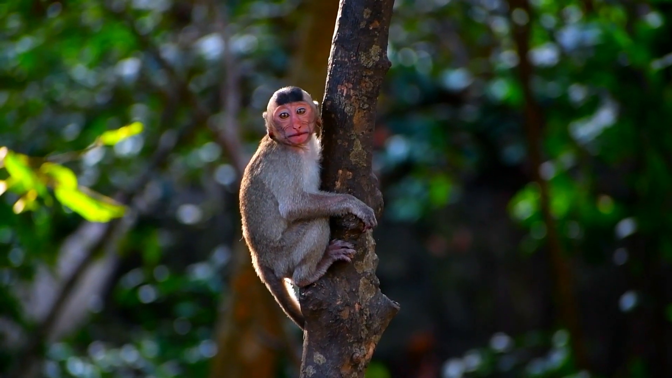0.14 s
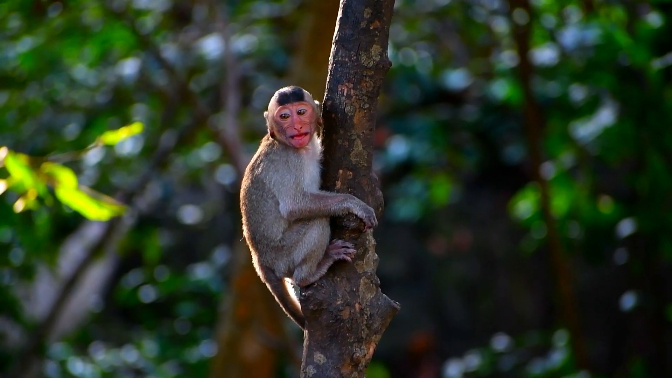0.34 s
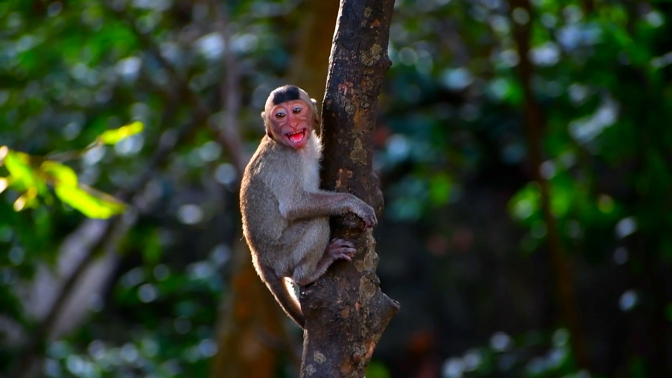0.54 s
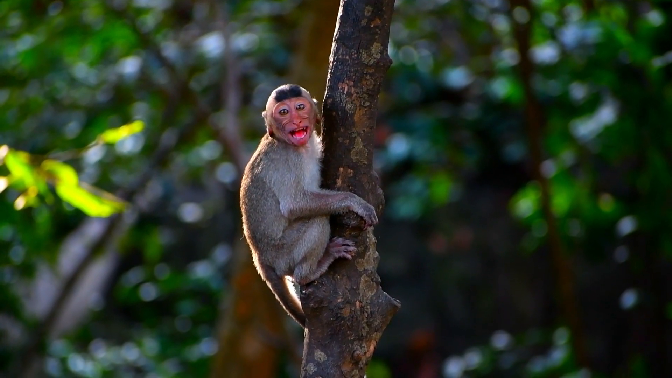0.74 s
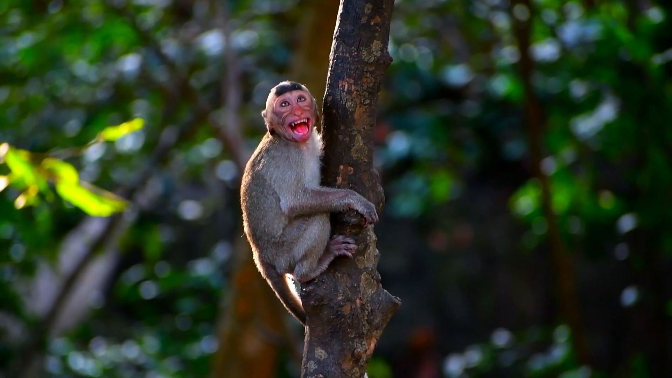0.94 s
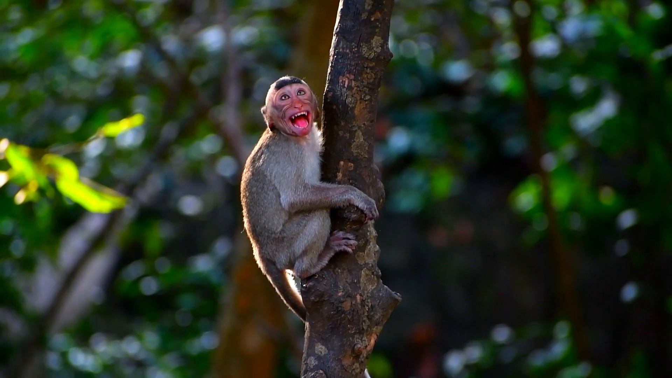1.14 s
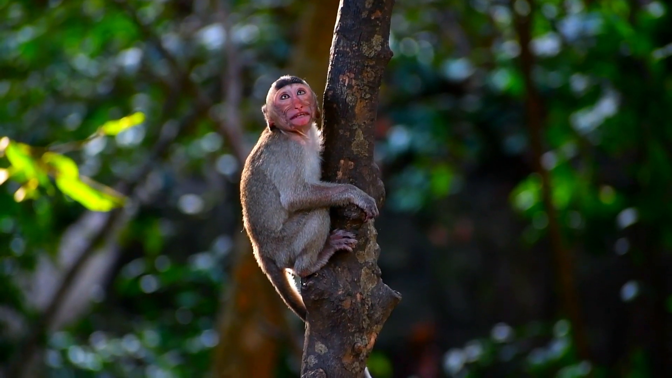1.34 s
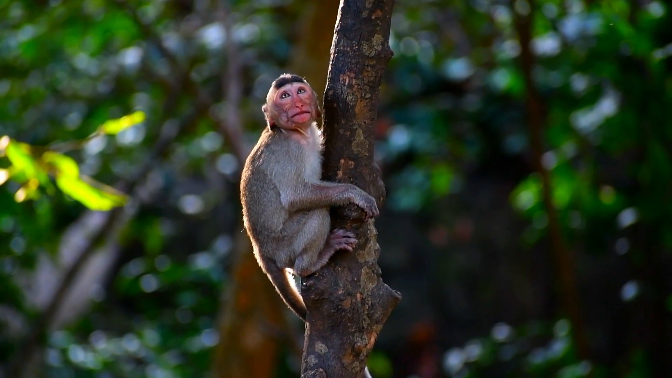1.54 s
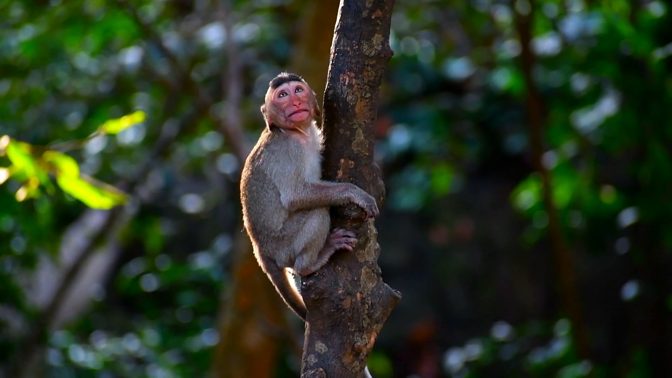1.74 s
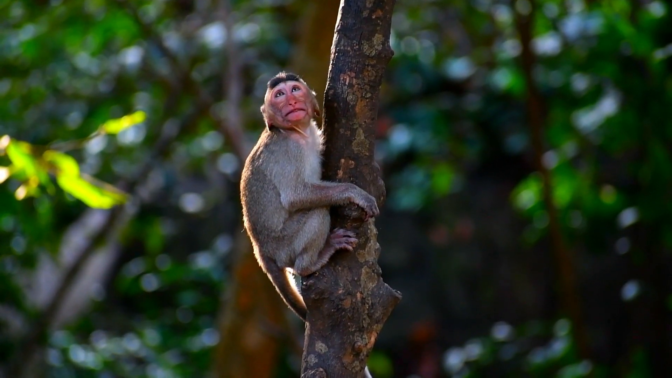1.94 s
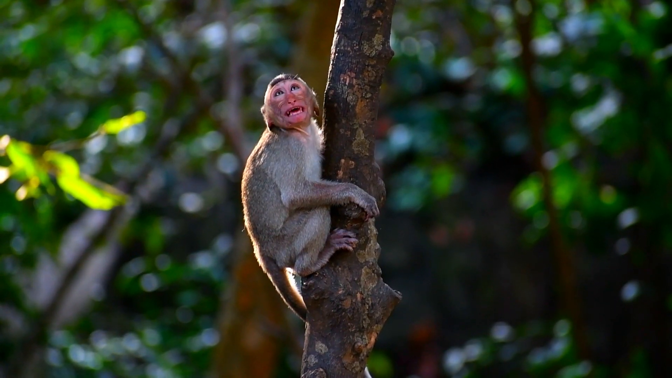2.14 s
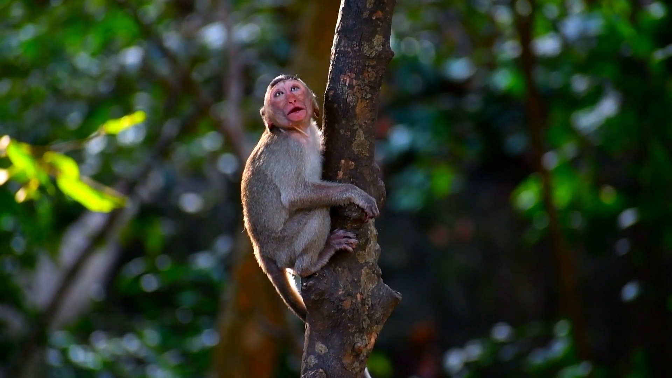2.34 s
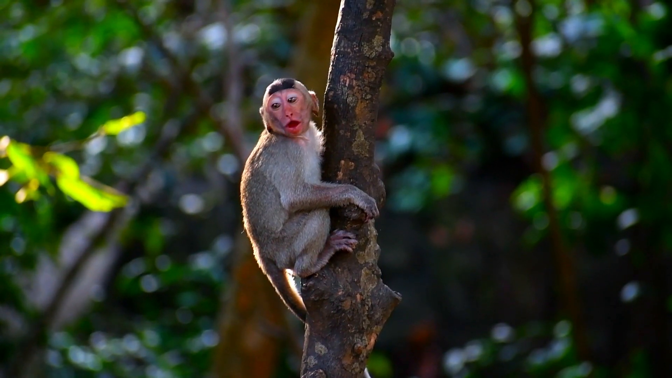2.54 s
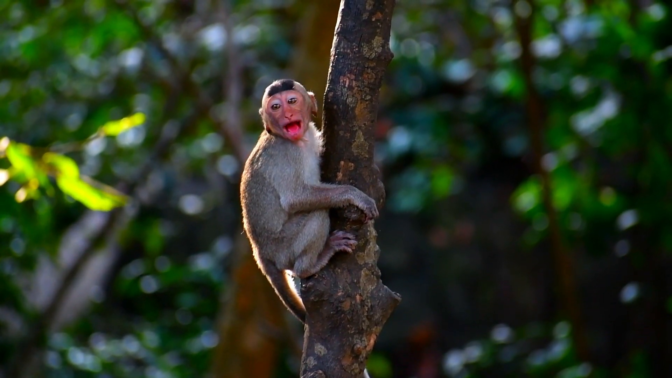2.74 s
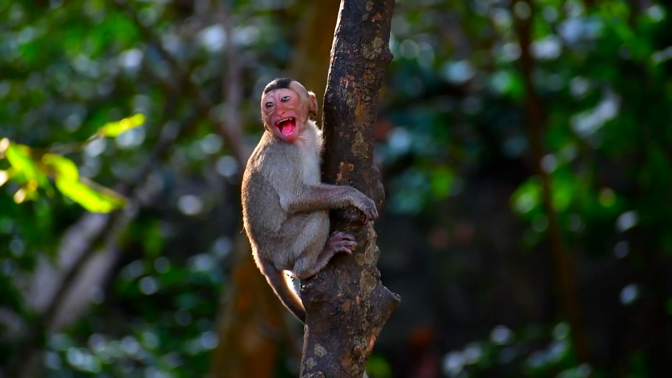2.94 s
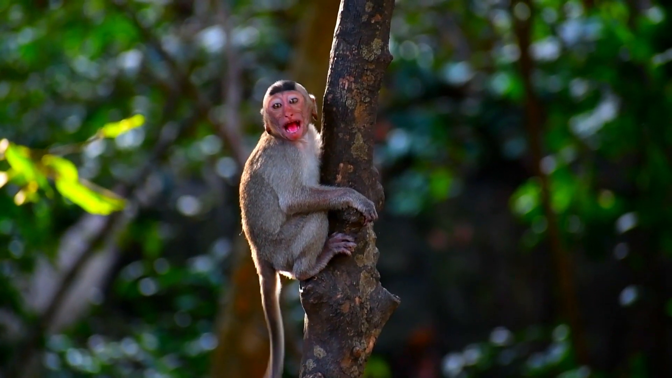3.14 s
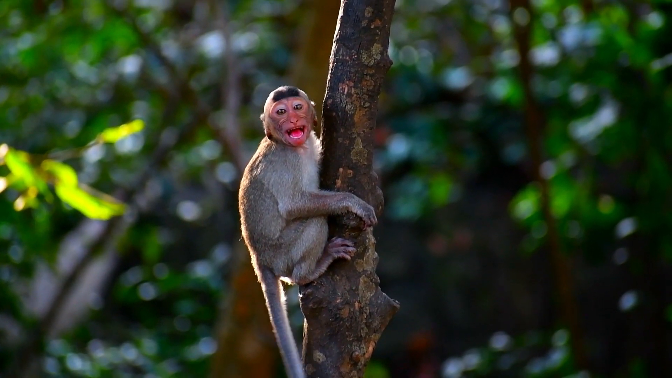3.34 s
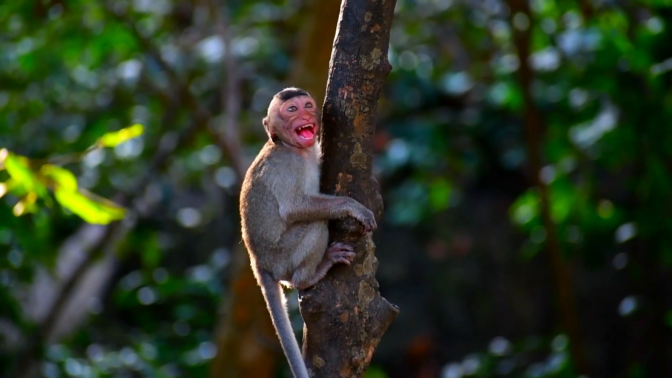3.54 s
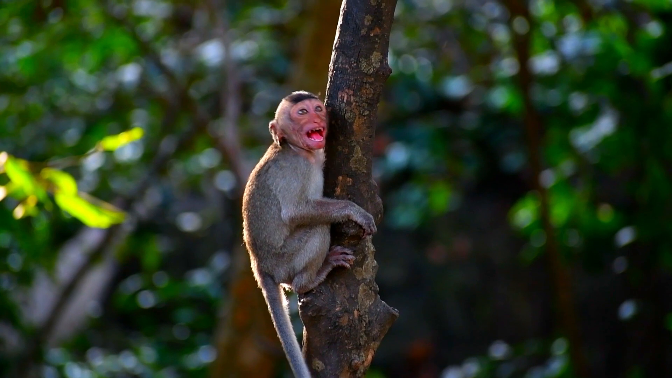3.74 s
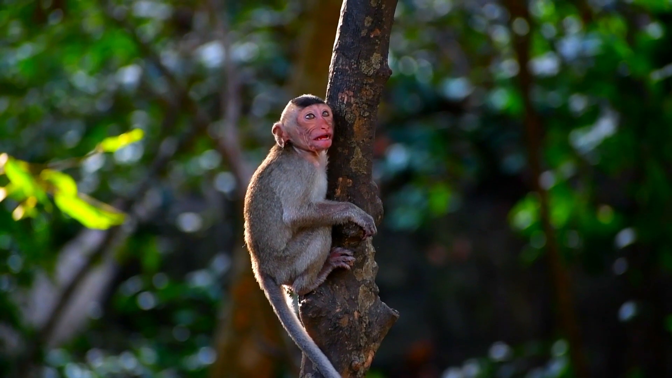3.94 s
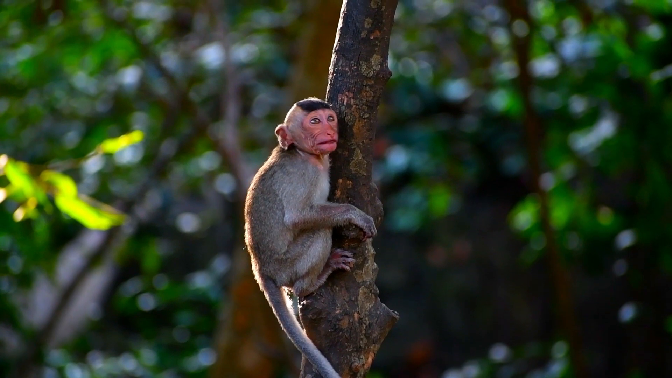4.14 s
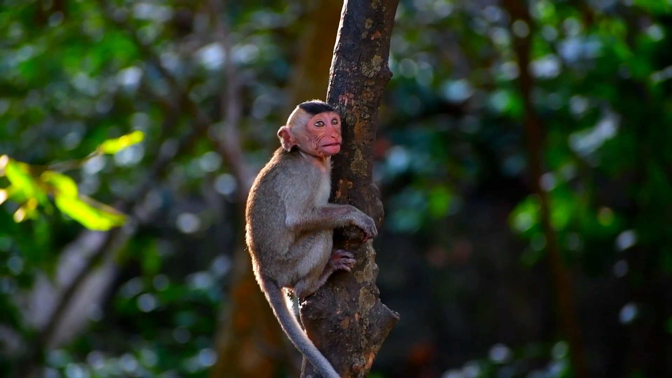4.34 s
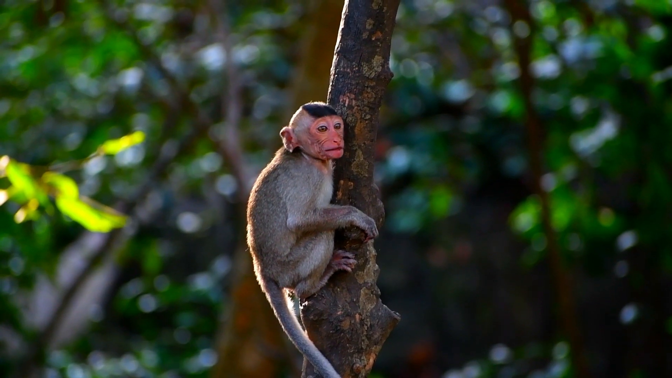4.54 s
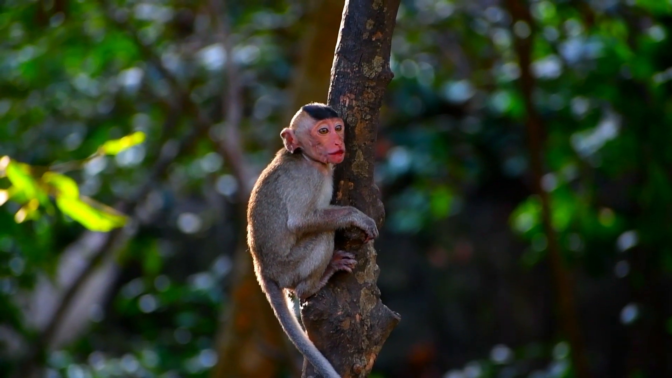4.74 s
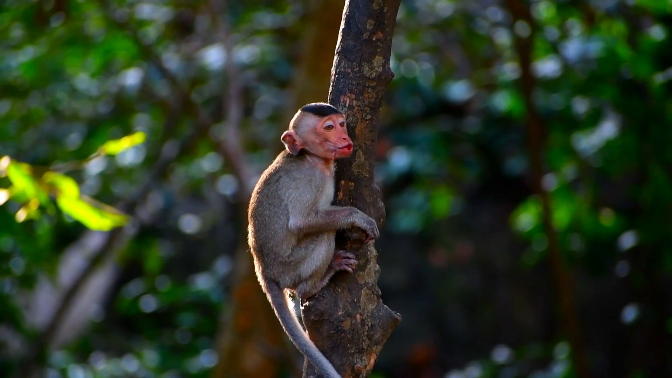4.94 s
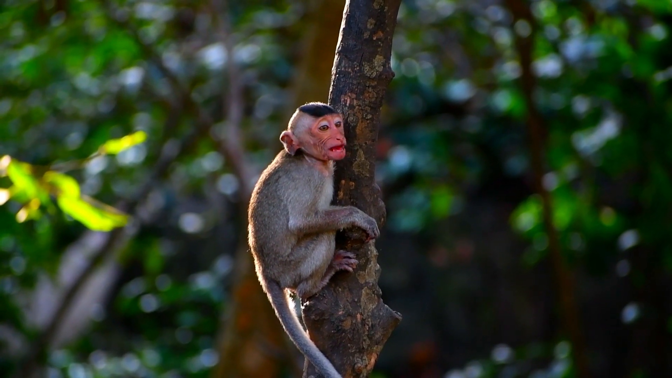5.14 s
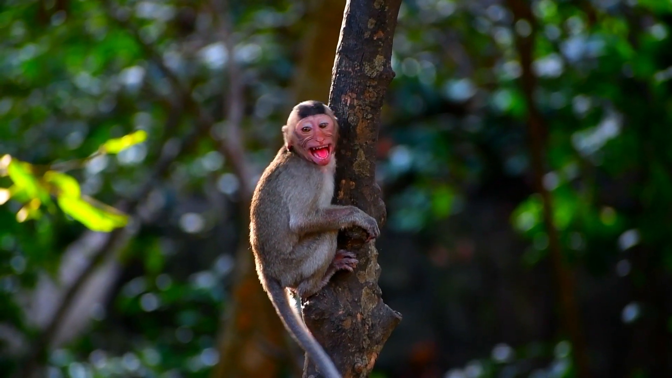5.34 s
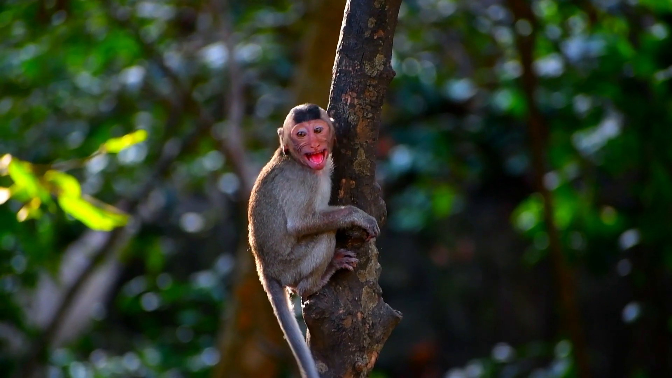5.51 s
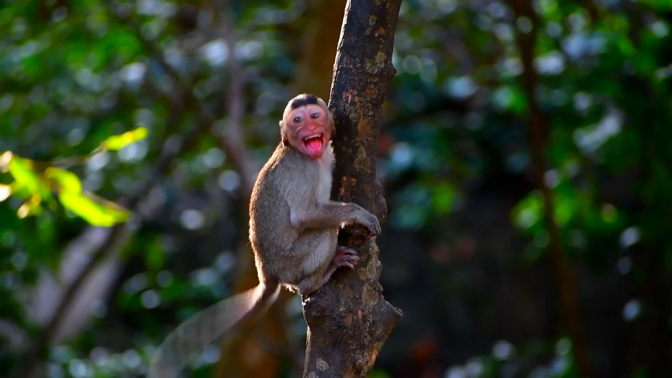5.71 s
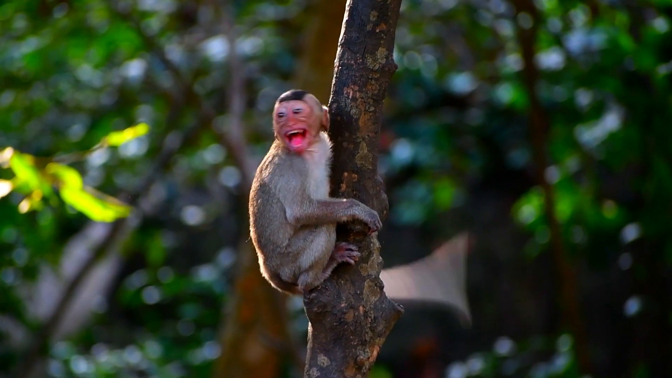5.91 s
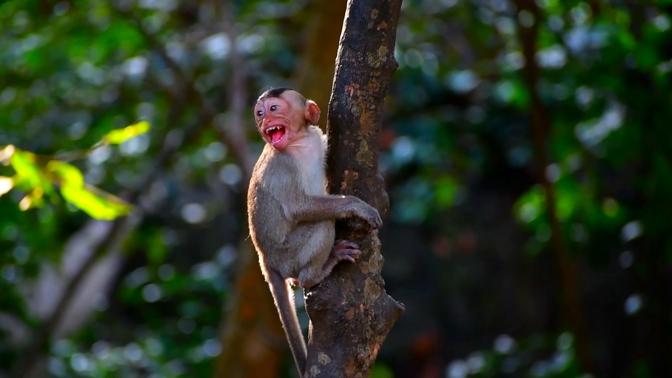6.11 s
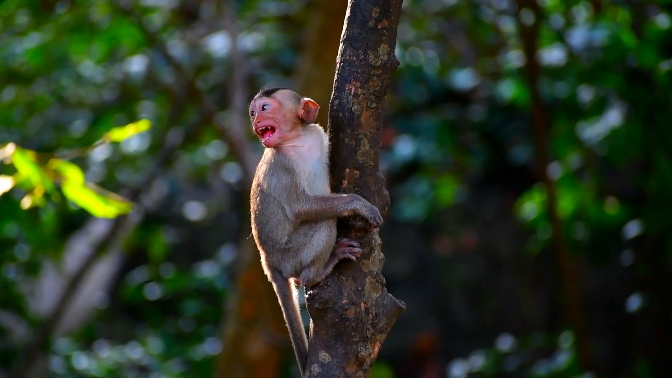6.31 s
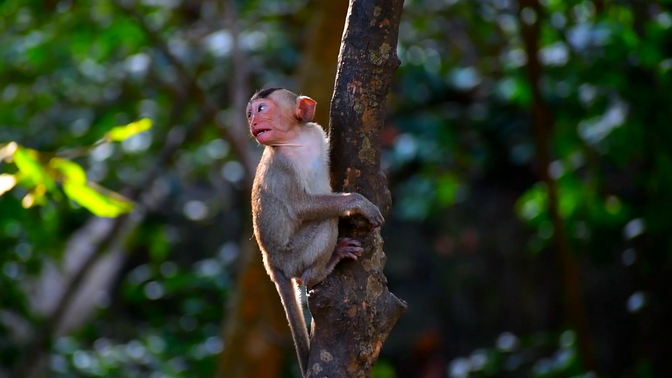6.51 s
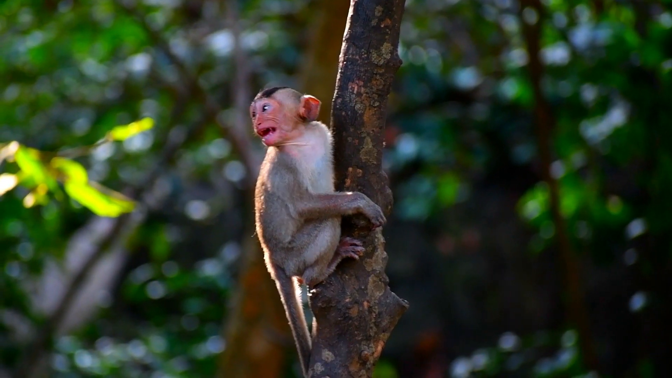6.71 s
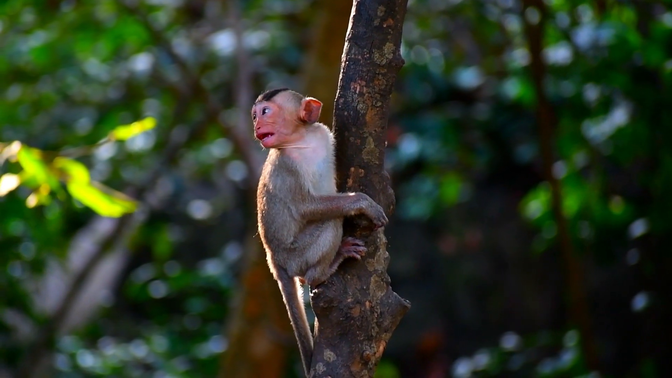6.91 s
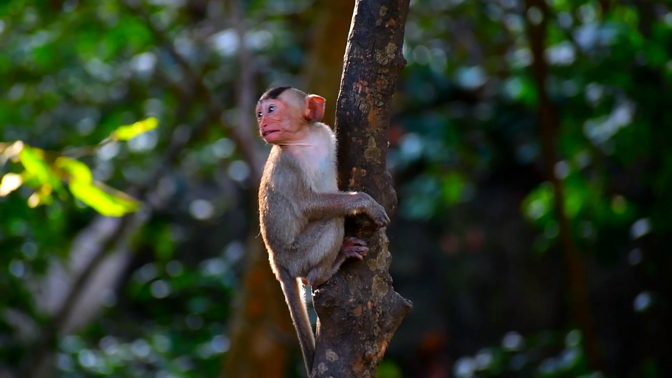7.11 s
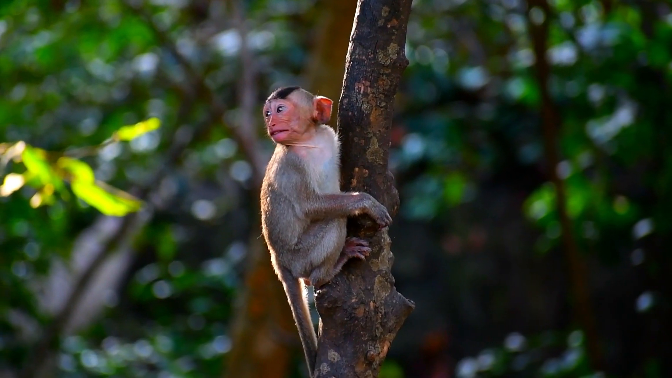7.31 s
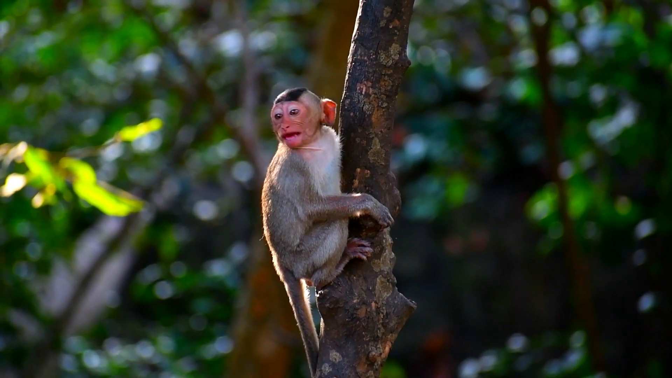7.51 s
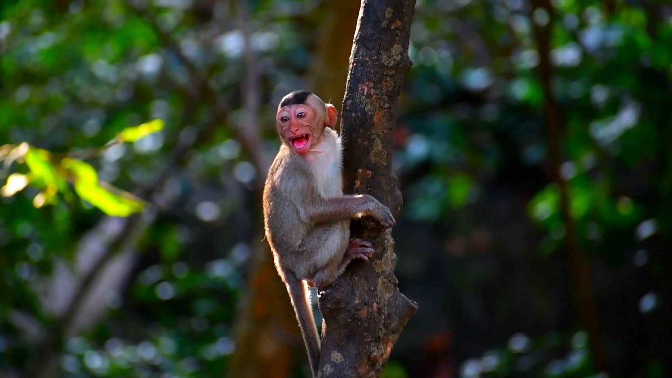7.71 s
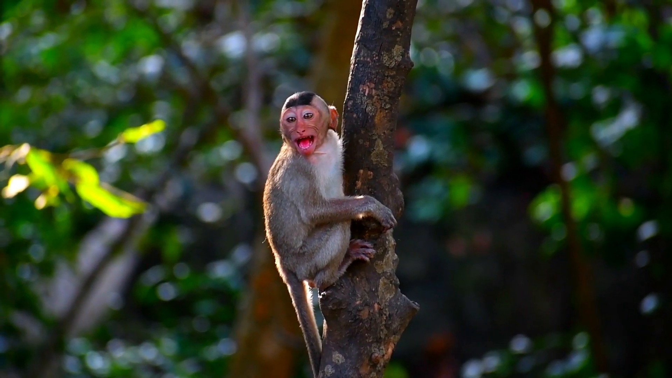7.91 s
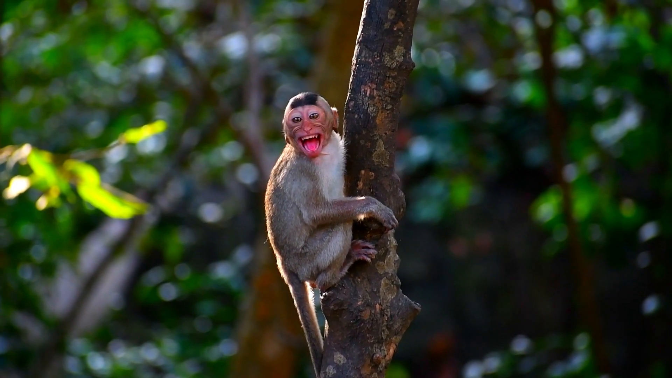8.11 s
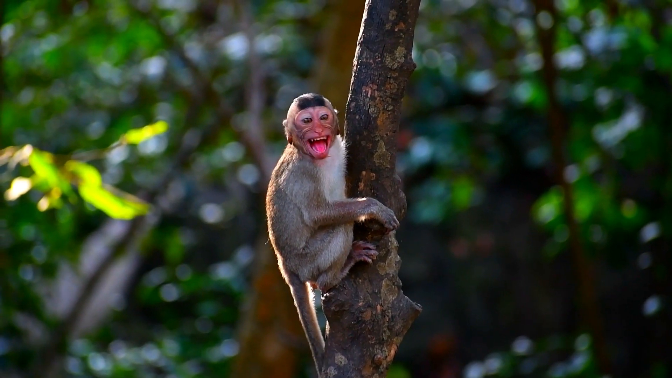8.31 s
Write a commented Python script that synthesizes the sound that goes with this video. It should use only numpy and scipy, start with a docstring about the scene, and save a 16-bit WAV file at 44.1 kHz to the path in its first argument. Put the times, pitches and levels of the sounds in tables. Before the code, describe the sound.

A young macaque cries in a quiet forest, heard fairly close, with a short diffuse echo from the trees. The tail of a high cry opens the scene; at 0.3-0.65 s a raspy whimper leaps into a squeal, and at 0.85-1.15 s a very high whistle arcs up and drops into a hoarse bark. Faint animal coos linger until about 2.1 s, with a small throaty yelp at 2.1. A low whine from 2.4 climbs into a shriek near 2.75-3.0, a soft distant moan beneath it; more squeals follow at 3.25-3.75. After a lull, a brief whimper comes at 4.6, then piercing cries at 4.9-5.45 and 5.6-6.25. A short rasp sounds at 6.65-6.8, and squealing resumes from 7.5 to the end. Throughout, a far bird whoops roughly every second, faint pips tick evenly until about 8 s, sparse twig or lip clicks appear, and soft rumble, hum and hiss remain.

```python
"""An infant macaque cries in a forest: low calls rich in harmonics, very high whistled arcs and hoarse rasps.
Each call is a sum of harmonics on a gliding pitch; roughness shakes it and adds puffs of breath noise.
Far off a bird whoops, another pips evenly and other animals coo, all as near sines; twigs and lips tick
as short noise bursts. A dying noise cloud makes the trees' echo; shaped noise gives rumble and hiss, and
a wavering sine the low hum."""
import sys
import numpy as np
from scipy import signal
from scipy.fft import rfft, irfft, next_fast_len
from scipy.io import wavfile

SR = 44100
rng = np.random.default_rng(int(sys.argv[2]) if len(sys.argv) > 2 else 0)


def dump_mix(stems):
    """Bounce the given channels to the path in sys.argv[1] as a 16-bit WAV at rate SR."""
    frames = np.atleast_2d(stems).T  # one column per channel
    limited = np.clip(frames, -1, 1)  # hard clip at full scale
    pcm = np.round(limited * 32767).astype(np.int16)
    wavfile.write(sys.argv[1], SR, pcm)


N = 368676

# resonances of throat and open mouth, which also colour the breath: (f/Hz, level/dB)
THROAT = [(600, -20), (1000, -1), (2200, 1), (3300, 6), (4500, 0), (5400, -5), (6500, -22), (7700, -4),
          (9200, -7), (10800, -17), (12600, -17), (15500, -23)]


def infant():
    """One voice with two registers: high whistles and low chest cries."""
    # hoarseness: pitch shake, loudness shake, uneven cycle pairs, slow pitch drift (RMS fraction)
    folds = dict(jitter=0.3, shimmer=0.9, halves=0.5, wander=0.002)
    out = np.zeros(N)
    whistles(out, folds)
    chest_cries(out, folds)
    return out


def whistles(out, folds):
    """Nearly one tone with weak overtones, loud where its pitch crosses a resonance of the mouth."""
    # pitch path of each whistle: (t/s, f/Hz)
    pitch_paths = [
        [(0, 4080), (.16, 4010)],
        [(.405, 2700), (.428, 2820)],
        [(.428, 2690), (.492, 2796)],
        [(.492, 2910), (.514, 3670)],
        [(0.516, 3103), (0.553, 4880), (0.566, 5000), (0.584, 5712), (0.594, 5650), (0.612, 5240),
         (0.626, 4700), (0.634, 4000), (0.652, 3983)],
        [(0.866, 2750), (0.898, 6400), (0.93, 9240), (0.96, 11050), (1.0, 11650), (1.052, 10470), (1.104, 7500)],
        [(2.732, 3000), (2.754, 5430), (2.784, 8320), (2.808, 9840), (2.854, 10900), (2.932, 11470),
         (2.956, 10970), (2.978, 8575)],
        [(2.985, 4290), (3.007, 3700)],
        [(3.31, 2710), (3.343, 3620)],
        [(3.347, 3193), (3.365, 3660), (3.387, 5120), (3.417, 5970), (3.503, 6609), (3.549, 9570),
         (3.575, 10700), (3.613, 11330), (3.665, 9483), (3.689, 7121)],
        [(3.425, 5370), (3.485, 4500)],
        [(3.69, 4330), (3.729, 3333)],
        [(5.127, 2640), (5.139, 2710), (5.155, 3850), (5.205, 7980), (5.223, 9440), (5.255, 10970),
         (5.307, 13150), (5.331, 12800), (5.363, 9541)],
        [(5.364, 9970), (5.395, 7390)],
        [(5.387, 3774), (5.41, 4220), (5.44, 3877), (5.456, 3340)],
        [(5.646, 8700), (5.668, 12230), (5.684, 13230), (5.71, 13950), (5.73, 13850), (5.762, 12500),
         (5.778, 12350), (5.802, 11050)],
        [(5.808, 11070), (5.816, 11610), (5.868, 9829), (5.948, 8936), (5.994, 8631), (6.011, 8362)],
        [(6.012, 8330), (6.06, 8530)],
        [(6.06, 8310), (6.1, 8820), (6.125, 9160), (6.18, 8810), (6.213, 8450), (6.245, 7100)],
        [(7.565, 2674), (7.69, 3250)],
        [(7.69, 3230), (7.72, 3660), (7.775, 5510)],
        [(7.775, 5420), (7.79, 4670), (7.815, 3980), (7.845, 3640)],
        [(8.012, 3030), (8.025, 3450), (8.035, 4500)],
        [(8.053, 8652), (8.079, 11300), (8.109, 12690), (8.127, 12980), (8.163, 11930), (8.211, 9418),
         (8.245, 7094)],
        [(8.305, 8420), (8.325, 9870), (8.359, 11050)],
    ]
    # effort in the same order, before mouth and edges; the first is the tail of an earlier cry:
    # (level/dB at start, level/dB at end, roughness 0-1 at start, roughness 0-1 at end)
    efforts = [ (-51.5, -68, 0.35, 0.21), (-37, -30.5, 0.15, 0.14), (-40.5, -42, 0.45, 0.59),
               (-43, -35, 0.1, 0.36), (-28, -27, 0, 0.32), (-35, -33.5, 0.19, 0.029),
               (-30.5, -33.5, 0.23, 0.14), (-40.5, -39.5, 0.62, 0.86), (-39, -37, 0, 0.17),
               (-30, -33.5, 0.02, 0.029), (-39, -41, 0.1, 0.31), (-29.5, -44, 0.45, 0.35),
               (-39.5, -34, 0.23, 0.018), (-31.5, -34, 0.03, 0.45), (-27, -34.5, 0.49, 0.135),
               (-34, -30.5, 0.08, 0.058), (-30, -31.5, 0.16, 0.031), (-46, -34.5, 0.46, 0.21),
               (-29, -37, 0, 0.19), (-35, -36, 0.29, 0.25), (-26, -27, 0.08, 0), (-27.5, -32, 0.32, 0.16),
               (-40.5, -31, 0.1, 0), (-36, -32.5, 0, 0.16), (-32.5, -33.5, 0.03, 0.0093)]
    # soft edges: (attack/s, depth below/dB, release/s, depth below/dB)
    edges = 0.008, 1.3, 0.0049, 2.3
    # mouth resonances that the whistle's pitch crosses: (f/Hz, level/dB)
    mouth = [(2500, -4.5), (3000, 3.5), (3400, 5), (3750, -1.5), (4200, 1.5), (4800, -4), (5600, -0.5),
             (6800, -3), (8700, 8.5), (9500, 4.5), (10300, -4), (11200, 1.5), (11800, 0), (12800, 4.5),
             (14000, 3)]
    # overtone level against pitch, before the throat: (pitch f/Hz, level/dB per overtone step)
    overtone_steps = [(2700, -7), (3200, -17), (4500, -16), (6300, -10), (9000, -12)]
    # low whistles leak more air: (mean pitch f/Hz, breath level/dB re voice at full roughness)
    leak = [(2800, -2), (4000, -6), (9000, -20.5)]

    def harmonic_db(order, hz):
        step_db = at_hz(overtone_steps, hz / order)
        throat_db = 0.11 * (order > 1) * at_hz(THROAT, hz)   # faint throat colour on overtones only
        return step_db * (order - 1) + throat_db

    for path, effort in zip(pitch_paths, efforts):
        rows = syllable(path, *effort, edges, mouth)
        breath_db = at_hz(leak, rows[:, 1].mean())
        add_call(out, rows, harmonic_db, count=5, flutter_hz=500, breath_db=breath_db, **folds)


def chest_cries(out, folds):
    """Chest cries are pulses rich in harmonics, shaped by the throat."""
    # pitch path of each cry: (t/s, f/Hz)
    pitch_paths = [
        [(.322, 1093), (.352, 1365), (.38, 1550)],
        [(.405, 940), (.428, 920)],
        [(.428, 1828), (.46, 1484), (.492, 1471), (.514, 1670)],
        [(.592, 1408), (.612, 1306), (.626, 1187), (.659, 945)],
        [(.835, 913), (.865, 1710)],
        [(1.13, 1706), (1.143, 1455), (1.158, 1146)],
        [(2.072, 1076), (2.108, 1270), (2.117, 1599), (2.138, 1626), (2.148, 1900)],
        [(2.148, 2130), (2.19, 1506)],
        [(2.43, 874), (2.47, 970), (2.536, 1037), (2.585, 1058), (2.66, 1177), (2.688, 1292), (2.7, 1347),
         (2.729, 1800)],
        [(3.23, 863), (3.255, 1110), (3.275, 1163)],
        [(3.275, 958), (3.305, 1030), (3.312, 1346), (3.343, 1764)],
        [(4.615, 955), (4.64, 1126), (4.672, 1280)],
        [(4.672, 1403), (4.7, 1452), (4.735, 1354), (4.757, 1060)],
        [(4.92, 960), (4.96, 1094), (5.008, 1150), (5.046, 1253), (5.102, 1488), (5.128, 1780)],
        [(5.43, 1295), (5.458, 1060)],
        [(5.616, 1200), (5.63, 2300)],
        [(6.64, 977), (6.67, 1038), (6.685, 1150), (6.7, 1477), (6.733, 1542)],
        [(6.729, 564), (6.754, 545)],
        [(6.752, 1257), (6.77, 1159), (6.792, 1013)],
        [(7.5, 950), (7.52, 1430), (7.54, 1560), (7.557, 1490), (7.567, 1665)],
        [(7.567, 1737), (7.69, 1924)],
        [(7.815, 2194), (7.852, 1810)],
        [(8.0, 1106), (8.03, 2010)],
    ]
    # effort in the same order, before the edges: (level/dB at start, level/dB at end, roughness 0-1 at start,
    # roughness 0-1 at end, brightness/dB per octave over the first four harmonics, added to the throat)
    efforts = [ (-43.5, -53.5, 0.21, 0.23, -1.5), (-50, -44, 0.7, 0, 5), (-45, -34.5, 0.36, 0.095, 8),
               (-26, -32.5, 0.26, 0.35, 22), (-43.5, -36.5, 0.3, 0.37, 1.5), (-18.5, -34.5, 0.01, 0.39, 13),
               (-47, -40.5, 0.2, 0.22, -11.5), (-30, -51, 0.6, 0.63, -1), (-57, -35.5, 0, 0.18, -1),
               (-44, -42.5, 0.1, 0.22, 1.5), (-61, -32, 0, 0.0027, 6.5), (-45.5, -51.5, 0.1, 0.042, -14.5),
               (-43.5, -48, 0.04, 0.18, -1.5), (-51, -43, 0.07, 0.17, -7), (-40, -34.5, 0.12, .05, 9),
               (-31, -42, 0.27, 0.06, 2.5), (-43, -38.5, 0.04, 0, 1.5), (-26, -30, 0.14, 0.42, 11),
               (-35, -36.5, 0, 0.26, 3), (-45.5, -39.5, 0.1, 0.055, 4), (-35, -49.5, 0.31, 0.39, 12.5),
               (-36, -43, 0.08, 0, 5), (-39, -40, 0.23, 0.15, 3)]
    # soft edges: (attack/s, depth below/dB, release/s, depth below/dB)
    edges = 0.021, 11, 0.0095, 2.9
    for path, (*effort, tilt_db) in zip(pitch_paths, efforts):
        def harmonic_db(order, hz):
            return at_hz(THROAT, hz) + tilt_db * np.log2(np.minimum(order, 4))

        rows = syllable(path, *effort, edges)
        add_call(out, rows, harmonic_db, count=20, flutter_hz=200, breath_db=-13, **folds)


def syllable(path, start_db, end_db, rough_start, rough_end, edges, resonances=((1.0, 0), (SR, 0))):
    """Rows for a call: effort and roughness drift evenly, edges are softer, resonances colour the level."""
    s, hz = np.transpose(path)
    t = np.linspace(s[0], s[-1], int((s[-1] - s[0]) * 500) + 2)   # about 500 rows a second
    progress = (t - s[0]) / (s[-1] - s[0])
    hz = glide(s, hz, t)
    attack_s, attack_db, release_s, release_db = edges
    soft_db = attack_db * np.maximum(1 - (t - s[0]) / attack_s, 0)
    soft_db = soft_db + release_db * np.maximum(1 - (s[-1] - t) / release_s, 0)
    level_db = start_db + progress * (end_db - start_db) - soft_db + at_hz(resonances, hz)
    rough = rough_start + progress * (rough_end - rough_start)
    return np.transpose([t, hz, level_db, rough])


def glide(s, hz, t):
    """A smooth cubic through the pitch points that never overshoots them."""
    steps = np.diff(hz) / np.diff(s)
    before, after = np.r_[steps[0], steps], np.r_[steps, steps[-1]]
    slope = 2 * np.maximum(before * after, 0) / (before + after + 1e-9)   # flat at turning points
    i = np.clip(np.searchsorted(s, t) - 1, 0, len(s) - 2)
    span, rise = s[i + 1] - s[i], hz[i + 1] - hz[i]
    u = (t - s[i]) / span
    bend_in = (1 - u) * (span * slope[i] - rise)
    bend_out = u * (span * slope[i + 1] - rise)
    return hz[i] + u * rise + u * (1 - u) * (bend_in - bend_out)


def add_call(out, rows, harmonic_db, count, jitter=0.15, shimmer=1.0, flutter_hz=500, breath_db=-99.0,
             edge_s=0.002, halves=0, wander=0):
    """Add harmonics of a gliding pitch; rough folds shake pitch and strength and leak air."""
    s, hz, level_db, rough = np.transpose(rows)
    at = np.arange(max(int(s[0] * SR), 0), min(int(s[-1] * SR), N))
    t = at / SR
    size = len(t)
    rough = np.clip(np.interp(t, s, rough), 0, 1)

    pitch = np.maximum(glide(s, hz, t), 100)
    unsteady = jitter * (rough ** 1.7 + 0.008) * wobble(size, flutter_hz)
    unsteady = unsteady + wander * wobble(size, 25)
    phase = 2 * np.pi * np.cumsum(pitch * (1 + unsteady)) / SR

    orders = np.arange(1, count + 1)[:, None]
    audible = orders * pitch < 0.45 * SR   # no harmonics near or above half the sample rate
    gains = from_db(harmonic_db(orders, orders * pitch)) * audible
    gains = gains / np.sqrt(np.sum(gains ** 2, axis=0) / 2)   # unit power whatever the timbre
    voiced = np.sum(gains * np.sin(orders * phase), axis=0)
    voiced = voiced * (1 - 0.5 * rough + shimmer * (rough + 0.05) * wobble(size, flutter_hz))
    # uneven cycle pairs put bands halfway between the harmonics
    voiced = voiced * (1 + halves * rough * wobble(size, flutter_hz) * np.sin(phase / 2))

    # the leak lies above the lowest pitch and comes in puffs
    above = signal.butter(2, hz.min(), "high", fs=SR, output="sos")
    leak = signal.sosfilt(above, coloured(rng.standard_normal(size), THROAT))
    breath = rms_one(leak * wobble(size, flutter_hz)) * from_db(breath_db) * np.sqrt(rough)

    edge = np.clip(np.minimum(t - s[0], s[-1] - t) / edge_s, 0, 1)
    out[at] += (voiced + breath) * edge * from_db(np.interp(t, s, level_db))


def far_calls():
    """Coos, whoops and pips: near sines; distance makes them waver."""
    out = np.zeros(N)
    add_coos(out)
    add_whoops(out)
    add_pips(out)
    return out


def add_coos(out):
    """Coos and moans of other animals: a fundamental and its second harmonic."""
    # (t/s, length/s, start f/Hz, held f/Hz, end f/Hz, level/dB at start, level/dB at end, roughness 0-1,
    # second harmonic level/dB re fundamental)
    notes = [(0.831, 0.11, 1038, 990, 987, -47, -41, 0.11, -23),
             (0.975, 0.24, 990, 1002, 1013, -53, -47, .2, -14.5),
             (1.15, .38, 1088, 1024, 985, -46, -57.5, 0.4, -7.5),
             (1.427, 0.46, 590, 702, 720, -58, -61, 0.33, -9),
             (1.648, 0.47, 902, 960, 985, -55, -74.5, 0.17, 1),
             (2.678, 0.39, 484, 848.5, 727, -45.5, -48, 0, -18)]
    for *note, second_db in notes:
        levels = np.array([[0], [second_db]])
        add_call(out, coo(*note), lambda order, hz: levels + 0 * hz, count=2, jitter=0.285, shimmer=1.0,
                 flutter_hz=82.8, edge_s=0.005, halves=0.65)


def coo(s, length, start_hz, held_hz, end_hz, start_db, end_db, rough):
    """Rows for a coo: a held note, reached and left by quick bends, its level drifting evenly."""
    rise_s, end_s = 0.05, 0.0515   # time constants of the bends
    t = np.linspace(0, length, num=40)
    bend_in = (start_hz - held_hz) * np.exp(-t / rise_s)
    bend_out = (end_hz - held_hz) * np.exp((t - length) / end_s)
    level_db = start_db + (end_db - start_db) * t / length
    return np.transpose([s + t, held_hz + bend_in + bend_out, level_db, rough + 0 * t])


def add_whoops(out):
    """A far bird repeats one rising sine whoop, each with its softer echo."""
    # (t/s, level offset/dB)
    times = [(-.058, -42.5), (0.954, -48), (2.033, -46), (3.274, -46), (4.336, -45), (5.43, -46),
             (6.449, -45.5), (7.488, -46)]
    # one whoop, then its echo: (t/s from the whoop's time, f/Hz, level/dB before the offset, roughness 0-1)
    shape = np.array([(-.014, 720, -44, 0), (0, 740, -10.5, 0.04), (.01, 783, 1.5, 0), (0.042, 850, 6, 0),
                      (0.067, 890, -3, 0), (.072, 902, -17, 0.06), (.15, 885, -13.5, 0.1),
                      (0.248, 876, -10.5, 0.04)])
    for s, db in times:
        add_call(out, shape + [s, 0, db, 0], lambda order, hz: 0 * hz, count=1, shimmer=2.06, flutter_hz=40.7)


def add_pips(out):
    """Another bird pips evenly: short sines of fixed pitch."""
    pip_hz, pip_db, pip_s = 694, -61, 0.0386   # pitch, mean level, length
    # even runs: (first t/s, period/s, how many)
    runs = [(.47, .4975, 4), (2.46, .47, 13)]
    for first, period, count in runs:
        for s in first + period * np.arange(count):
            db = pip_db + rng.normal(0, 1.2)
            rows = [(s, pip_hz, db, 0), (s + pip_s, pip_hz, db, 0)]
            add_call(out, np.array(rows), lambda order, hz: 0 * hz, count=1, edge_s=0.0034)


def ticks():
    """Twigs and lip smacks: puffs of noise in a broad band, dying by a 12 ms time constant."""
    # (t/s, peak level/dB, centre f/Hz)
    hits = [(1.737, -42, 2020), (1.949, -45, 2560), (4.164, -41.5, 1400), (5.686, -38.5, 6000),
            (6.268, -36, 2980)]
    size = 800   # samples, about 18 ms
    out, t = np.zeros(N), np.arange(size) / SR
    for s, db, hz in hits:
        band = signal.butter(1, [hz / 2, min(hz * 2, SR / 3)], "band", fs=SR, output="sos")
        puff = signal.sosfilt(band, rng.standard_normal(size)) * np.exp(-t / 0.012)
        start = int(s * SR)
        out[start:start + size] += from_db(db) * puff / np.abs(puff).max()
    return out


def forest(x):
    """Trunks scatter the sound into a dying cloud of echoes."""
    # colour of the echo: (f/Hz, level/dB)
    echo_colour = [(1000, -5.5), (3400, -10), (6000, -3), (9000, -10), (14000, -8.5)]
    t60_s, onset_s = 0.44, 0.00022   # time to fall 60 dB, fade-in
    t = np.arange(SR) / SR
    cloud = rng.standard_normal(SR) * from_db(-60 * t / t60_s) * np.clip(t / onset_s, 0, 1)
    cloud = cloud / np.sqrt(np.sum(cloud ** 2))   # unit energy
    return signal.fftconvolve(x, coloured(cloud, echo_colour))[:N]


def air():
    """Distant rumble and hiss, with a wavering hum: (shared by the ears, differing)."""
    # noise spectrum before scaling: (f/Hz, level/dB per Hz)
    spectrum = [(55, -1.5), (117, 2), (256, 0.5), (481, -11), (900, -12), (3250, -22), (10000, -20.5),
                (15600, -26)]
    # the treble differs more between the ears: (f/Hz, level/dB)
    side_tilt = [(100, -4.5), (300, 5), (3000, 15.5)]
    air_db, side_db = -53, -20   # shared noise RMS; gain of the differing part, before its tilt
    hum_hz, hum_width_hz, hum_db = 246, 5, -58.5   # pitch, swell bandwidth, gain
    mid, side = rms_one(coloured(rng.standard_normal((2, N)), spectrum)) * from_db(air_db)
    drift = wobble(N, 3.1)   # phase wander, radians
    hum = wobble(N, hum_width_hz) * np.sin(2 * np.pi * hum_hz * np.arange(N) / SR + drift)
    return np.array([mid + from_db(hum_db) * hum, from_db(side_db) * coloured(side, side_tilt)])


def from_db(db):
    """Decibels to gain."""
    return 10 ** (np.asarray(db) / 20)


def rms_one(x):
    """Scale to unit power."""
    return x / np.sqrt(np.mean(x ** 2) + 1e-20)


def at_hz(points, hz):
    """Read a spectrum table on a log-frequency axis."""
    table_hz, table_db = np.array(points).T
    return np.interp(np.log(hz + 1), np.log(table_hz), table_db)   # + 1 keeps 0 Hz finite


def coloured(x, points):
    """Filter by a spectrum table."""
    size = next_fast_len(x.shape[-1])
    gains = from_db(at_hz(points, np.fft.rfftfreq(size, 1 / SR)))
    return irfft(rfft(x, size) * gains, size)[..., :x.shape[-1]]


def wobble(size, hz):
    """Low-passed noise below hz, scaled to RMS 1."""
    low = signal.butter(2, min(hz, SR / 3), fs=SR, output="sos")
    noise = signal.sosfilt(low, rng.standard_normal(size + 2000))
    return rms_one(noise[2000:])   # skip the filter's settling


def scene():
    """All sources sit in the middle; only the air differs a little between the ears."""
    near = infant() + far_calls() + ticks()
    mid, side = air()
    return near + forest(near) + mid + side * [[1], [-1]]


def record(dry):
    """The deepest bass and the top are cut."""
    rumble_cut_hz, top_cut_hz = 42, 15750
    high_pass = signal.butter(8, rumble_cut_hz, "high", fs=SR, output="sos")
    low_pass = signal.ellip(14, 0.3, 75, top_cut_hz, fs=SR, output="sos")   # 0.3 dB ripple, 75 dB stop
    return signal.sosfilt(low_pass, signal.sosfilt(high_pass, dry))


dry = scene()
out = record(dry)
dump_mix(out)
```